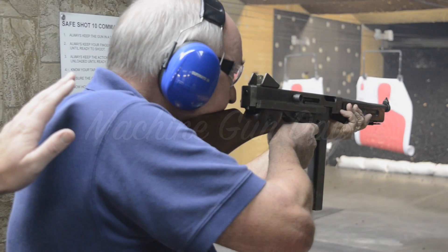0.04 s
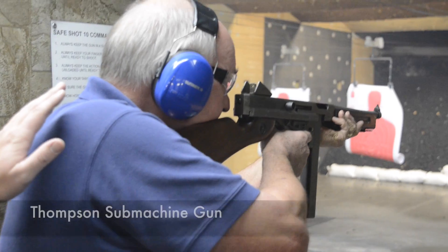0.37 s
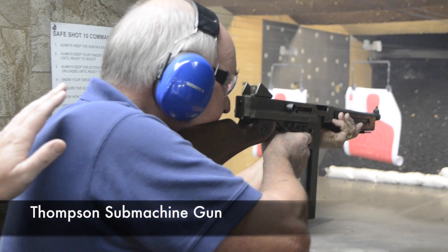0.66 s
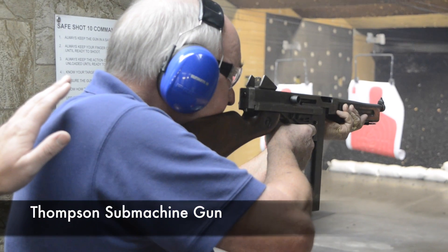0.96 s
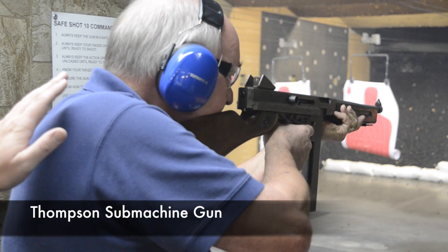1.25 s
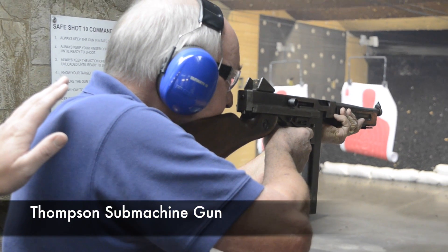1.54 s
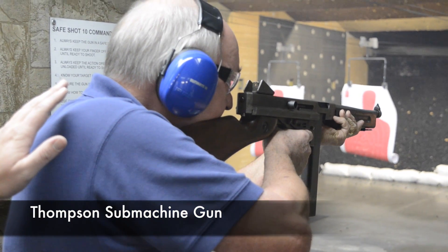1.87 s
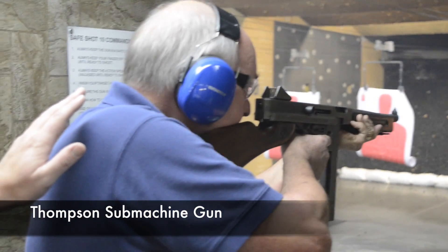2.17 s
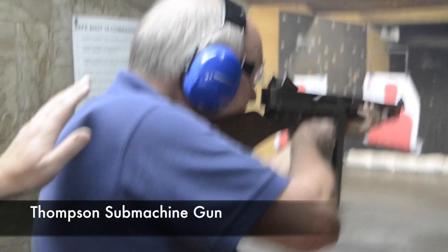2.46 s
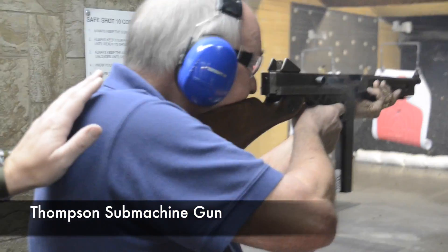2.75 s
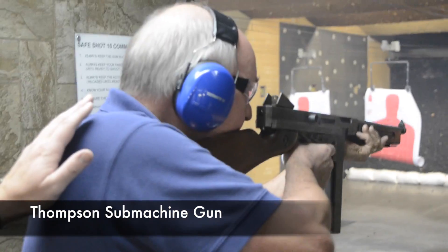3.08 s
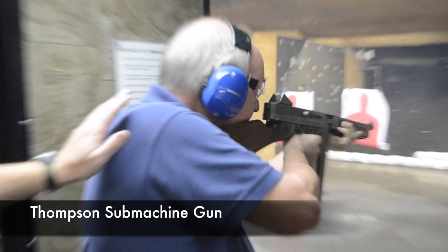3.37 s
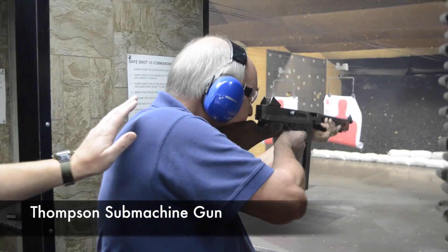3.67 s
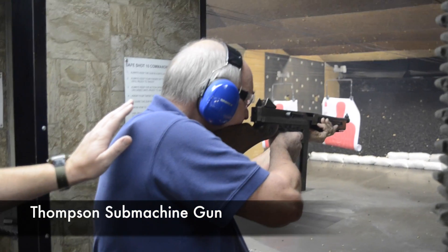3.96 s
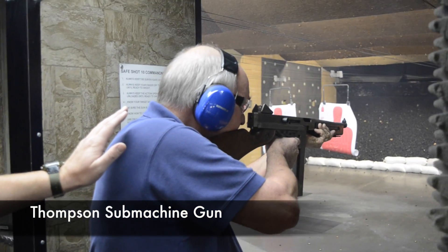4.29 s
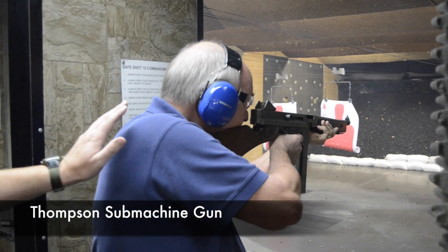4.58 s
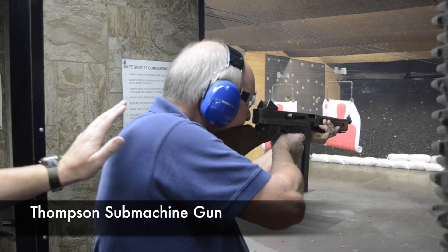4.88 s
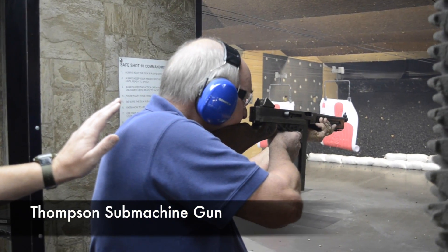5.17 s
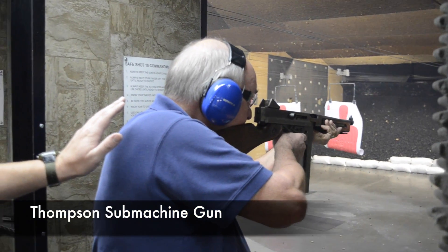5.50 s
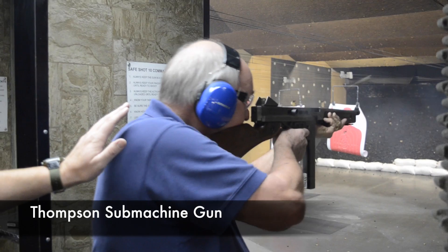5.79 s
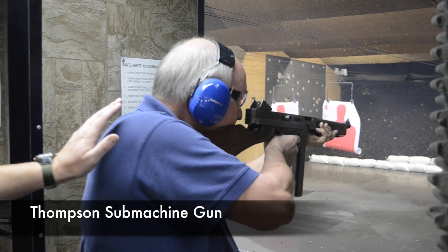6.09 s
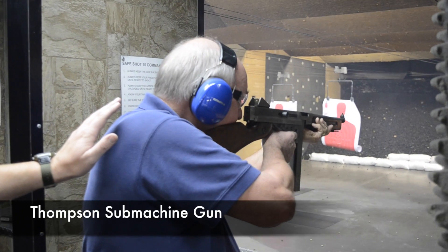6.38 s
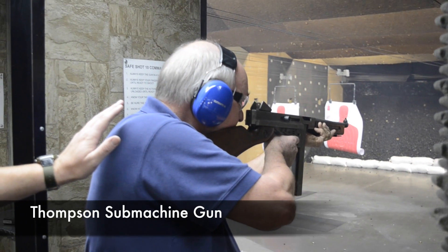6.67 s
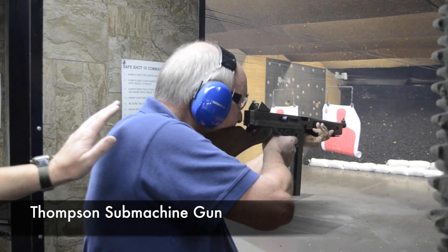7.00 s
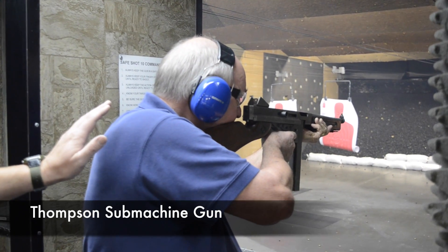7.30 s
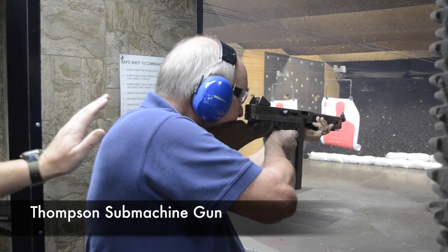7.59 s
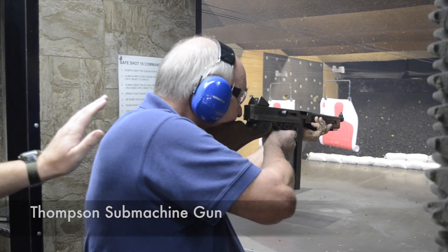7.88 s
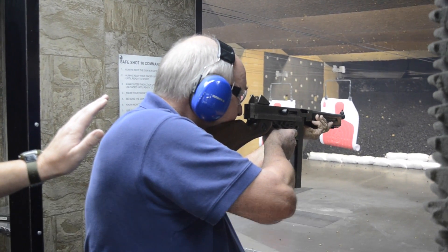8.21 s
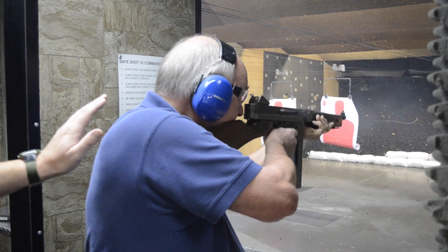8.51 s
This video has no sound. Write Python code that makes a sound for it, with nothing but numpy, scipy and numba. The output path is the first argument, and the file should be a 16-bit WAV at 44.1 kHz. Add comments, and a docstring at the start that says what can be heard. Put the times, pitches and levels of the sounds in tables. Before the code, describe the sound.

In an indoor shooting range, pistol shots from other lanes ring out first, then a nearby submachine gun fires one round with a metallic clack, and cases ring off a steel panel. Quick pistol shots follow, then a second close round, more clangs and scattered gunfire, and a last close round at the end. Each blast booms off hard walls and distorts slightly, with small handling clicks and faint ventilation in the gaps.

```python
"""An indoor shooting range. A submachine gun fires single rounds beside the microphone, its heavy bolt
clacking before and after each, while pistols and a small-bore gun go off in other lanes. Every blast
excites the reverberation and standing waves of the concrete hall. Spent cases ring the steel booth and
tinkle on the floor; guns click as they are handled, over soft scrapes, a dull thud and ventilation.
The blasts overload the microphone, and a limiter holds down their tails."""
import sys
import numpy as np
from scipy import signal
from scipy.fft import rfft, irfft, next_fast_len
from scipy.io import wavfile
from numba import njit

SR = 44100
rng = np.random.default_rng(int(sys.argv[2]) if len(sys.argv) > 2 else 0)


def dump_mix(stems):
    """Bounce the given channels to the path in sys.argv[1] as a 16-bit WAV at rate SR."""
    frames = np.atleast_2d(stems).T  # one column per channel
    limited = np.clip(frames, -1, 1)  # hard clip at full scale
    pcm = np.round(limited * 32767).astype(np.int16)
    wavfile.write(sys.argv[1], SR, pcm)


N = 381465

# shots of each gun: start_s, level_db, blast_re_level_db, tilt_db_per_octave
SUBMACHINE_SHOTS = [(2.5794, -4, 16, 0.5), (5.6863, -5, 18.5, 0), (8.559, -5, 17, 0.4)]
PISTOL_SHOTS = [(.3532, -3.5, 18.5, 0.63), (.757, -6, 11.5, 1.17), (3.952, -4.5, 19.5, 0.56),
                (4.2105, -5.5, 17.5, 0.45), (4.4165, -9, 11, 1), (6.481, -4.5, 19.5, 1.05),
                (7.175, -3.5, 16, 1.03), (8.161, -5, 14, 1.44)]
SMALL_BORE_SHOTS = [(.6352, -14, -0.5, -5), (4.372, -22.5, 2.5, -4), (6.005, -14.5, -2.5, -4),
                    (7.692, -11.5, 2, -5.5)]
# the bolt strips a cartridge, closes and slams back: after_shot_s, level_db, t60_s
BOLT_CYCLE = [(-.042, -14.5, 0.14), (-.011, -1, .05), (.088, -0.5, .2)]
# cases striking the booth: start_s, level_db, lowest_mode_db, first_flight_s, rebound_count
BOOTH_STRIKES = [(3.204, 2.5, -1.5, .084, 1), (3.3285, -0.5, 2, 0, 0), (3.497, -6, -8.5, .055, 1),
                 (3.616, -12.5, -1.5, .049, 1), (3.851, -32, 4, 0, 0), (6.1524, -0.5, -9, 0, 0),
                 (6.298, -7.5, -12.5, .041, 3)]
# guns and magazines being handled: start_s, level_db, centre_hz, t60_s
HANDLING_CLICKS = [(0.2155, -9.5, 3345, 0.06), (.2203, -9, 3440, 0.039), (1.054, -6, 3300, 0.048),
                   (1.357, -33.5, 1700, .04), (1.689, -29, 5300, 0.027), (1.741, -19, 5900, 0.073),
                   (1.86, -28, 1810, 0.096), (2.1178, -29, 1860, 0.044), (2.2336, -32.5, 1810, 0.065),
                   (2.2538, -33, 3460, 0.11), (2.39, -28, 4720, .063), (2.4927, -10, 3260, 0.01),
                   (5.0554, -19.5, 5460, 0.015), (5.371, -27.5, 5300, 0.099), (6.673, -14.5, 2230, 0.15),
                   (6.783, -19.5, 3700, 0.24), (6.8265, -15, 3330, 0.18), (6.97, -29, 4400, 0.18),
                   (7.4946, -18.5, 2340, 0.11), (8.1016, -23.5, 5300, 0.028)]
# an opening tail of noise, soft swelling scrapes and a dull thud: start_s, level_db, centre_hz, rise_s
SCRAPES_AND_THUD = [(.001, -25.5, 1300, 0.00024), (5.552, -13, 1500, 0.054), (7.074, -27.5, 694, 0.0061),
                    (8.494, -20, 1510, 0.011)]
# cases landing on concrete: start_s, level_db, pitch_hz, first_flight_s, rebound_count
FLOOR_LANDINGS = [(.003, -47.5, 7900, .232, 1), (1.272, -43, 10780, 0, 0), (1.999, -41, 10910, .195, 2),
                  (5.04, -52, 11250, 0, 0), (5.371, -34, 11460, 0, 0), (7.492, -56, 9600, 0, 0),
                  (8.102, -36, 9720, 0, 0)]
# spectral envelopes of the noise sources: frequency_hz, relative_db
SUBMACHINE_SPECTRUM = [(25, -43.5), (90, -29), (135, -11), (190, -9), (300, -6), (800, -1.5), (1500, -6),
                       (3000, -9.5), (5000, -15), (8500, -16.5), (16000, -36)]
PISTOL_SPECTRUM = [(25, -30.5), (90, -14.5), (135, -12.5), (190, -8.5), (400, -4.5), (800, -0.5),
                   (1250, -2.5), (1800, -8), (3700, -15.5), (5200, -20), (8000, -22.5), (11000, -29.5),
                   (16000, -40)]
SMALL_BORE_SPECTRUM = [(40, -54.5), (200, -30), (290, -23.5), (520, -23), (750, -16.5), (1700, 0),
                       (3300, -1.5), (4200, -6), (8000, 0.5), (16000, -23.5)]
BOLT_SPECTRUM = [(100, -29.5), (500, -20), (1300, -0.5), (2300, -2.5), (4000, -1), (6000, -6.5),
                 (9000, -7.5), (16000, -41.5)]
VENT_SPECTRUM = [(15, -51), (25, -26.5), (135, 1.5), (191, -6.5), (264, -1), (529, -13), (1670, -10),
                 (2370, -20.5), (4620, -21), (5720, -35), (6540, -22.5), (10900, -38.5), (15000, -55)]
# modes of the booth's steel panel: pitch_hz, relative_db, t60_s
PANEL_MODES = [(415, -9, 0.72), (1060, -5.5, 0.5), (1336, 2.5, 0.26), (1427, -13, 0.41), (1696, -22, .45),
               (1820, 5, 0.24), (1930, 3.5, 0.26), (2060, 2.5, 0.39), (2300, -3, .3), (2400, 6, 0.31),
               (2510, -29, .4), (2780, -14.5, .35), (3170, 6, 0.34), (2900, -17, .35), (3320, -15, 0.31),
               (3260, -27, .35), (3520, -29, .4), (3680, -12.5, .4), (4010, -15, 0.5), (4603, -18, .4),
               (5970, -16.5, .45), (6500, -16.5, .5)]
# resonances of the guns' steel parts: centre_hz, width_hz, gain_db
GUN_RESONANCES = [(1780, 120, 10.5), (3580, 480, 1.5), (4850, 390, 1.5)]
# standing waves between floor, ceiling and side walls: pitch_hz, relative_db, t60_s
ROOM_MODES = [(79.6, -5.5, 1.1), (137.4, 0, 1.51), (288, 1.5, 1.19)]
# the hall's base reverberation time: frequency_hz, t60_s
HALL_DECAY = [(50, 1.8), (135, 1), (350, 0.98), (1000, 1.054), (2400, 0.75), (4500, 0.54), (8000, 0.38),
              (16000, 0.098)]
# dips in the microphone's response: centre_hz, width_hz, depth_fraction
MIC_DIPS = [(5696, 500, 0.9), (6840, 250, 0.6)]


def gunfire(shots, spectrum, blast_t60_s, wall_s, wall_db, swell_db, swell_s, stretch,
            boom_db, push_db, push_s=0.001):
    """Impulse response of a room: a muzzle blast, its wall reflection, reverberation, standing waves."""
    track, blast_t = np.zeros(N), seconds(.2)
    for start_s, db, blast_db, tilt_db in shots:
        tilted = [(hz, band_db + tilt_db * np.log2(hz / 1000)) for hz, band_db in spectrum]
        tail = reverberation(tilted, stretch)
        t = np.arange(len(tail)) / SR
        # echoes returning from down the range swell the tail
        swell = (t / swell_s) ** 2 * np.exp(2 * (1 - t / swell_s))
        add(track, start_s, undb(db) * tail * (1 + undb(swell_db) * swell))
        boom = sum(undb(mode_db) * np.sin(2 * np.pi * (hz + 2 * rng.standard_normal()) * t) * fade(t, t60)
                   for hz, mode_db, t60 in ROOM_MODES)
        add(track, start_s, undb(db + boom_db) * boom)
        # the gas cloud gives one push of pressure, then suction
        push = undb(push_db) * (1 - blast_t / push_s) * np.exp(-blast_t / push_s)
        burst = noise(tilted, len(blast_t)) * fade(blast_t, blast_t60_s)
        blast = undb(db + blast_db) * (burst + push)
        add(track, start_s, blast)
        add(track, start_s + wall_s, undb(wall_db) * blast)
    return track


def bolt(rise_s=0.0037, room_db=-17):
    """Friction and impact: sliding steel swells into a clack at the same points of every firing cycle."""
    track, t = np.zeros(N), seconds(.3)
    for shot_s, *_ in SUBMACHINE_SHOTS:
        for after_s, db, t60 in BOLT_CYCLE:
            slide = 2 * (1 - np.exp(-t / rise_s)) * fade(t, t60)
            add(track, shot_s + after_s, undb(db) * slide * noise(BOLT_SPECTRUM, len(t)))
            tail = reverberation(BOLT_SPECTRUM, stretch=1.0, size=32000)
            add(track, shot_s + after_s, undb(db + room_db) * tail)
    return track


def booth_hits(strike_ring_db=-10, rebound_ring_db=-31, loss_db=3.5):
    """Inelastic collision: each strike is followed by its weaker rebounds, which hardly ring the panel."""
    for start_s, db, lowest_db, flight_s, count in BOOTH_STRIKES:
        yield start_s, db, strike_ring_db, lowest_db
        first_rebound_db = -9.5 + 0.37 * db
        for k, rebound_s in enumerate(bounces(start_s, flight_s, count)[1:]):
            yield rebound_s, first_rebound_db - loss_db * k, rebound_ring_db, lowest_db


def booth_clangs(crack_hz=4640, crack_t60_s=0.1, contact_s=0.0017,
                 modes_db=-7.5, clash_db=-1, bloom_s=0.025):
    """Modal vibration: a case cracks on the steel panel, whose modes ring differently at every spot."""
    track, t = np.zeros(N), np.arange(32000) / SR
    hz, mode_db, t60 = np.transpose(PANEL_MODES)[:, :, None]
    modes = undb(mode_db) * np.exp(2j * np.pi * hz * t) * fade(t, t60)
    for start_s, db, ring_db, lowest_db in booth_hits():
        phases = np.exp(2j * np.pi * rng.random(len(modes)))
        excitation = phases * undb(2 * rng.standard_normal(len(modes)))
        excitation[0] *= undb(lowest_db)
        tones = undb(modes_db) * (excitation @ modes).imag
        # countless weak modes blur into a clash
        clash = reverberation(impact_spectrum(crack_hz * 0.86, -4.5, -9.5), stretch=0.89, size=len(t))
        ring = (tones + undb(clash_db) * clash) * (1 - np.exp(-t / bloom_s))
        crack_envelope = fade(t, crack_t60_s) * (1 - np.exp(-t / contact_s))
        crack = noise(impact_spectrum(crack_hz, -5, -16), len(t)) * crack_envelope
        add(track, start_s, undb(db) * (crack + undb(ring_db) * ring))
    return track


def faint_clicks(per_s=3.5, level_db=-37.5, spread_db=4, centre_hz=2800, t60_s=.04):
    """Random impacts: light touches scattered in time, in level and over an octave of pitch."""
    draws = rng.random((int(per_s * N / SR), 3))
    return [(when * N / SR, level_db + spread_db * (2 * force - 1), centre_hz * 2 ** (pitch - .5), t60_s)
            for when, force, pitch in draws]


def handling(room_db=-19, cutoff_hz=10500):
    """Resonance: short metal clicks ring the steel parts of the guns."""
    clicks, t = np.zeros(N), seconds(.2)
    for start_s, db, hz, t60 in HANDLING_CLICKS + faint_clicks():
        click = noise(impact_spectrum(hz, -10.5, -9.5), len(t)) * fade(t, t60)
        add(clicks, start_s, undb(db - 1) * click)
        tail = reverberation(impact_spectrum(hz, -9, -9), stretch=.65, size=24000)
        add(clicks, start_s, undb(db + room_db) * tail)
    ringing = sum(undb(db) * resonator(clicks, hz, width_hz) for hz, width_hz, db in GUN_RESONANCES)
    lowpass = signal.butter(4, cutoff_hz, fs=SR, output="sos")
    return signal.sosfilt(lowpass, (clicks + ringing) / 2)


def scrapes_and_thud():
    """Rise and decay shape diffuse noise: a fading tail at the start, soft swelling scrapes, a dull thud."""
    track, t = np.zeros(N), np.arange(32000) / SR
    for start_s, db, hz, rise_s in SCRAPES_AND_THUD:
        tail = reverberation(impact_spectrum(hz, -3.5, -8), stretch=0.33, size=len(t))
        add(track, start_s, undb(db) * tail * (1 - np.exp(-t / rise_s)))
    return track


def floor_tinkles(t60_s=0.28, mean_split_hz=70, twin_db=-3, scatter_db=-2, loss_db=0.5):
    """Beating: a brass case rings with the same close pair of modes at each landing."""
    track, t = np.zeros(N), seconds(0.38)
    for start_s, db, hz, flight_s, count in FLOOR_LANDINGS:
        twin_hz = hz + mean_split_hz * (.5 + rng.random())
        pair = np.sin(2 * np.pi * hz * t) + undb(twin_db) * np.sin(2 * np.pi * twin_hz * t)
        for k, landing_s in enumerate(bounces(start_s, flight_s, count)):
            # the walls scatter the ring into a narrow hiss
            scatter = noise([(hz * .93, -70), (hz, 0), (hz * 1.07, -70)], len(t))
            ring = (pair + undb(scatter_db) * scatter) * fade(t, t60_s)
            add(track, landing_s, undb(db - loss_db * k) * ring)
    return track


def ventilation(air_db=-51.5, hum_hz=134.0, hum_db=-61):
    """Flow noise: air rushes through the ducts over a fan's hum."""
    air = noise(VENT_SPECTRUM, next_fast_len(N))[:N]
    hum = np.sin(2 * np.pi * hum_hz * np.arange(N) / SR)
    return undb(air_db) * air + undb(hum_db) * hum


def reverberation(spectrum, stretch, size=72000):
    """Diffuse field: each octave dies away in the hall's reverberation time multiplied by stretch."""
    t, hz = np.arange(size) / SR, np.fft.rfftfreq(size, 1 / SR)
    bins, tail = rfft(noise(spectrum, size)), 0
    octave = np.log2(np.clip(hz, 32, 16384))
    for k in range(5, 15):
        band = irfft(bins * np.maximum(1 - abs(octave - k), 0), size)
        tail = tail + band * fade(t, stretch * lookup(HALL_DECAY, 2. ** k))
    return tail


def bounces(start_s, flight_s, count, restitution=.9):
    """Restitution: the landing times of a case whose flights shorten geometrically."""
    return start_s + np.append(0, np.cumsum(flight_s * restitution ** np.arange(count)))


def impact_spectrum(hz, below_db, above_db):
    """A brief impact has a broad spectrum: a hump whose slopes are roughly in dB per octave."""
    return [(hz / 32, 5 * below_db), (hz / 1.3, 0), (hz * 1.2, 0), (hz * 16, 4 * above_db)]


def noise(spectrum, size):
    """Spectral shaping: coloured noise of rms 1."""
    gains = undb(lookup(spectrum, np.fft.rfftfreq(size, 1 / SR)))
    shaped = irfft(rfft(rng.standard_normal(size)) * gains, size)
    return shaped / shaped.std()


def resonator(sound, hz, width_hz):
    """Second-order resonance with unit gain at its centre."""
    return signal.lfilter(*signal.iirpeak(hz, hz / width_hz, fs=SR), sound)


def lookup(rows, hz):
    """Interpolation of (frequency_hz, value) rows on a logarithmic frequency axis."""
    points_hz, values = np.transpose(rows)
    return np.interp(np.log(hz + 1), np.log(points_hz), values)


def fade(t, t60):
    """Exponential decay, 60 dB down after t60."""
    return np.exp(-np.log(1000) * t / t60)


def add(track, start_s, sound):
    """Superposition: a sound adds to the track from start_s on."""
    start = max(int(start_s * SR), 0)
    part = sound[:max(N - start, 0)]
    track[start:start + len(part)] += part


def undb(db):
    """Decibels to amplitude ratio."""
    return 10 ** (np.asarray(db) / 20)


def seconds(length_s):
    """Uniformly sampled time axis."""
    return np.arange(int(length_s * SR)) / SR


@njit
def gain_reduction(over_db, droop_db, attack_db, release_db):
    """Peak limiting: the cut in dB follows recent excess peaks, at bounded rates per sample."""
    cut_db, peak, held = np.empty(len(over_db)), 0., 0.
    for i in range(len(over_db)):
        peak = max(over_db[i], peak - droop_db)
        held = max(min(peak, held + attack_db), held - release_db, 0.)
        cut_db[i] = held
    return cut_db


def scene():
    """Superposition: the pressures from all lanes add at one microphone."""
    submachine = gunfire(SUBMACHINE_SHOTS, SUBMACHINE_SPECTRUM, blast_t60_s=0.094,
                         wall_s=0.0029, wall_db=-31, swell_db=10, swell_s=0.098, stretch=1.0,
                         boom_db=-20.5, push_db=-18)
    pistols = gunfire(PISTOL_SHOTS, PISTOL_SPECTRUM, blast_t60_s=0.079,
                      wall_s=0.006, wall_db=-7.5, swell_db=12, swell_s=0.051, stretch=1.07,
                      boom_db=-22, push_db=0, push_s=0.00072)
    small_bore = gunfire(SMALL_BORE_SHOTS, SMALL_BORE_SPECTRUM, blast_t60_s=0.045,
                         wall_s=.0095, wall_db=17.5, swell_db=7.5, swell_s=0.052, stretch=0.82,
                         boom_db=-40, push_db=-15.5)
    foreground = submachine + pistols + small_bore + bolt() + booth_clangs()
    return (foreground + handling() + scrapes_and_thud() + floor_tinkles() + ventilation())[None]


def record(dry, headroom_db=10, threshold=.78,
           droop_db_per_s=500, attack_db_per_s=750, release_db_per_s=150, cutoff_hz=16000):
    """Overload: the microphone colours and saturates; peaks that outrun the limiter are cut flat."""
    sound = dry[0]
    for hz, width_hz, depth in MIC_DIPS:
        sound = sound - depth * resonator(sound, hz, width_hz)
    saturated = undb(headroom_db) * np.tanh(sound / undb(headroom_db))
    over_db = 20 * np.log10(abs(saturated) / threshold + 1e-9)
    cut_db = gain_reduction(over_db, droop_db_per_s / SR, attack_db_per_s / SR, release_db_per_s / SR)
    limited = np.clip(saturated * undb(-cut_db), -1, 1)
    lowpass = signal.ellip(8, .2, 60, cutoff_hz, fs=SR, output="sos")
    return signal.sosfilt(lowpass, limited)[None]


dry = scene()
out = record(dry)
dump_mix(out)
```